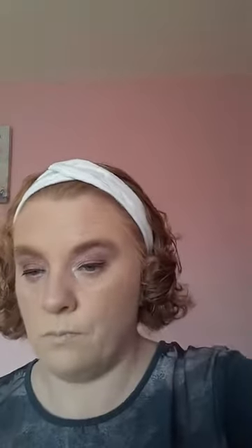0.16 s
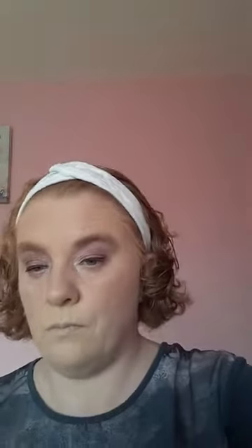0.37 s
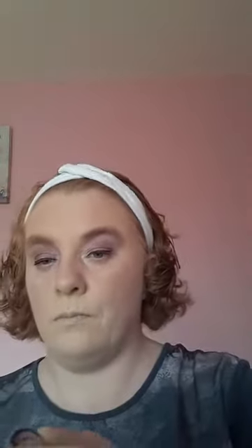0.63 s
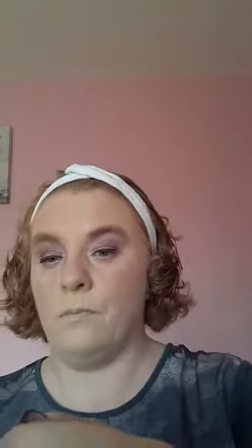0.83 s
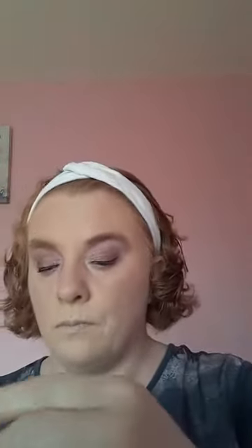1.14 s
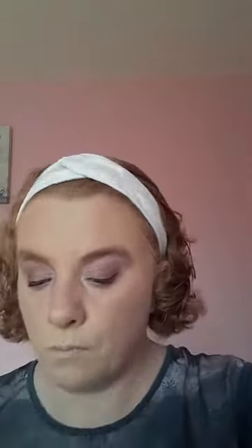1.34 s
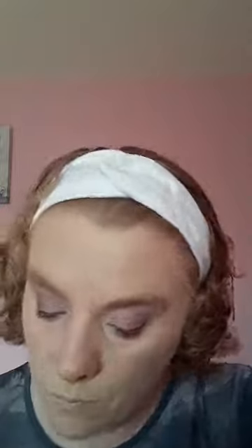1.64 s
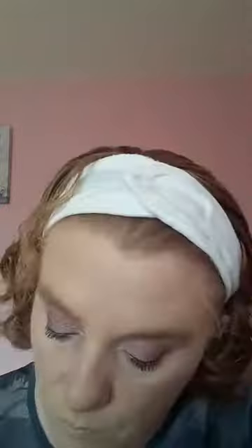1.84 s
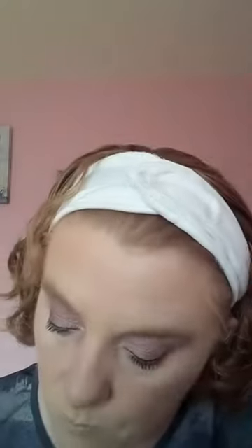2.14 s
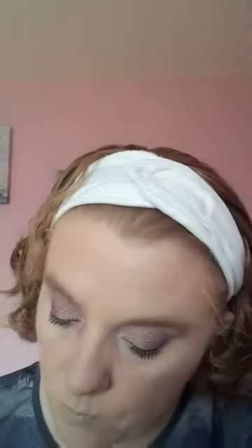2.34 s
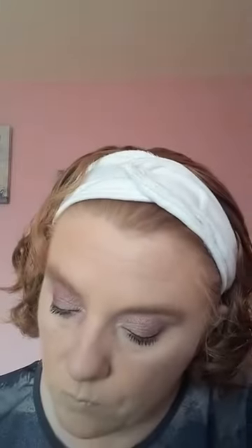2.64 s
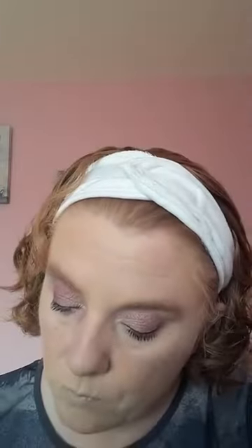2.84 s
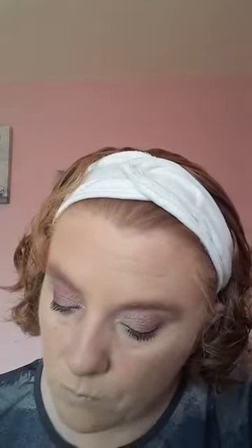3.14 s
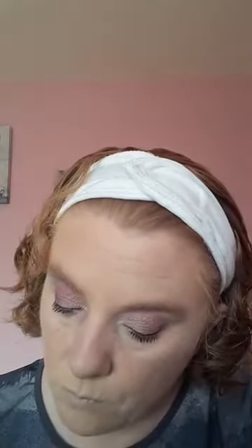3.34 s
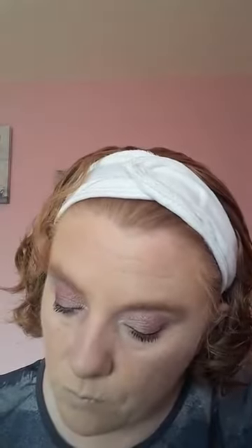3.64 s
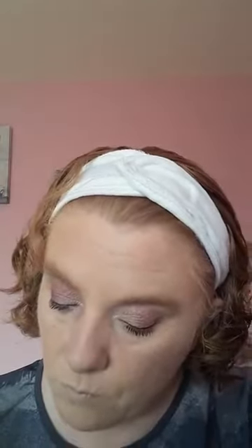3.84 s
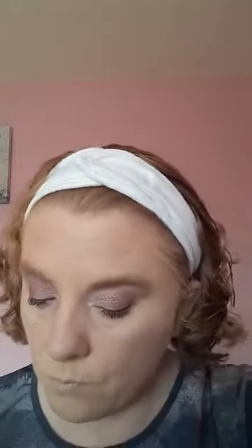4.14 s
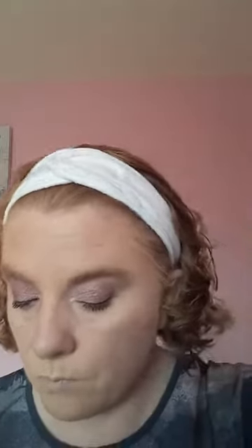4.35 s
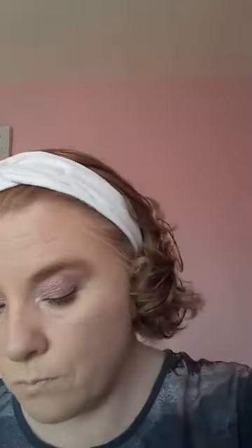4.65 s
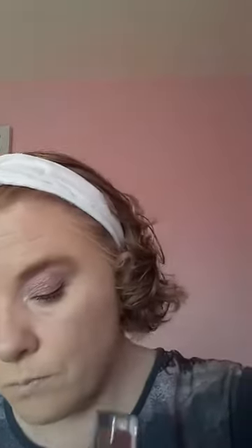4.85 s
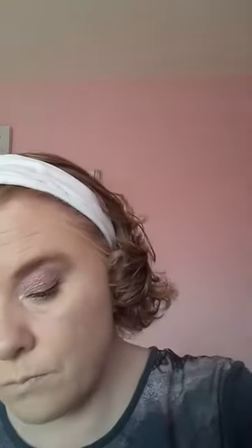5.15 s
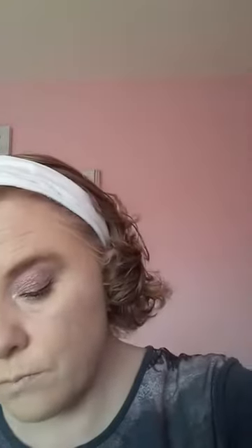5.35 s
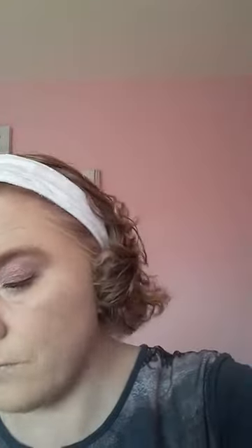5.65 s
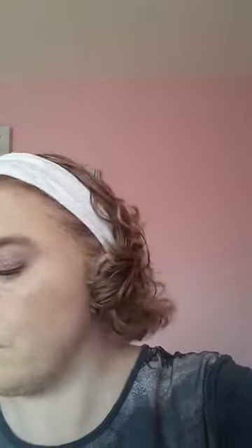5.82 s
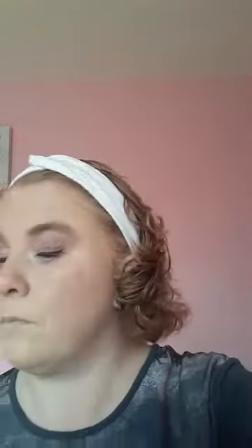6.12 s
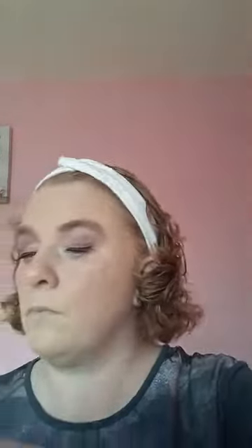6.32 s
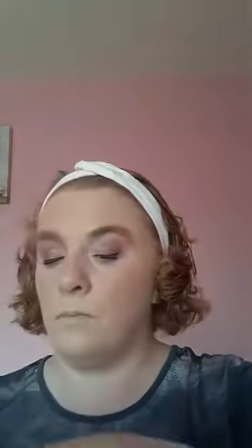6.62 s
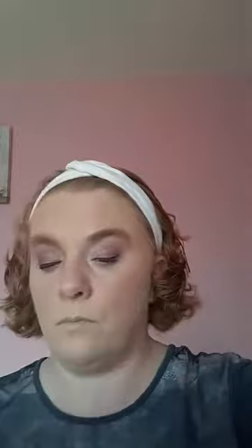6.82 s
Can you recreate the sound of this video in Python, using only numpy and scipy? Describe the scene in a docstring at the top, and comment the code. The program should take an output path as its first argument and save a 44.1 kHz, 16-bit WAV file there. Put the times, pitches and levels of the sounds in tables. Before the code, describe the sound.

Small hard plastic make-up cases clatter and click in a hollow tray as a hand rummages, pauses briefly, then stirs in denser bursts.

```python
"""A hand rummages through small hard plastic make-up cases in a hollow tray, in a quiet furnished room.
First the tail of an earlier knock and a short burst; then a lull over faint room tone, with a few light contacts.
From about 2.5 s denser bursts: each knock is a bright tick, a short shell ring and the tray's hollow note, all
decaying sines; random rattles and noise scrapes crowd between, noise rumbles as the tray shifts on the table,
and decaying-noise reflections answer. The bursts thin out after 6 s; one faint tap comes near the end."""
import sys
import numpy as np
from scipy import signal
from scipy.io import wavfile
from scipy.ndimage import uniform_filter1d

SR = 44100
rng = np.random.default_rng(int(sys.argv[2]) if len(sys.argv) > 2 else 0)


def dump(signal):
    """Clip the signal to [-1, 1] and save it as 16-bit WAV at the path in sys.argv[1]."""
    limited = np.clip(np.atleast_2d(signal).T, -1, 1)
    pcm = np.round(limited * 32767).astype(np.int16)
    wavfile.write(sys.argv[1], SR, pcm)


def how_loud(loudness_db):
    """Turn decibels into a plain amplitude multiplier (0 dB gives 1, 20 dB gives 10)."""
    steps = np.asarray(loudness_db, float) / 20
    return 10 ** steps


N = 307818

# clear knocks: (time [s], tray note level [dB], case pitch [Hz], case ring level [dB], bright tick level [dB])
CLEAR_KNOCKS = [(0.028, -42, 1845, -44, -35), (0.049, -13.5, 3120, -21.5, -18),
                (0.054, -21.5, 2991, -13.5, -21), (0.073, -21.5, 2204, -31.5, -19),
                (0.0852, -16.5, 2140, -23, -16.5), (0.096, -24.5, 1986, -18, -16.5),
                (0.103, -10.5, 2646, -24, -23), (0.1442, -17.5, 3398, -18, -12),
                (0.1936, -15, 2540, -19, -20), (0.204, -20, 1870, -24, -21.5),
                (0.2084, -14, 3218, -27.5, -20.5), (0.2256, -33, 2560, -14, -14.5),
                (0.238, -26, 2700, -17.5, -23), (0.2416, -13, 2618, -23.5, -26.5),
                (0.2623, -24, 2809, -24, -25.5), (0.2745, -32.5, 2706, -25, -27.5),
                (0.3111, -24.5, 2201, -33, -34), (0.3197, -40.5, 2600, -39, -32.5),
                (0.3378, -23.5, 2193, -29, -34.5), (0.6172, -44.5, 2250, -43.5, -49.5),
                (0.6848, -50.5, 1640, -81, -69), (0.7169, -48, 2280, -61.5, -53.5),
                (2.016, -40, 2350, -40, -43), (2.0677, -43, 5300, -48, -50), (2.08, -38, 2346, -41.5, -54),
                (2.239, -71, 4550, -51, -48), (2.25, -45.5, 4500, -59.5, -59.5),
                (2.3624, -42.5, 1630, -50.5, -45.5), (2.373, -43, 1707, -49, -44.5),
                (2.4208, -50, 1500, -45.5, -57), (2.4447, -40, 2000, -38.5, -51.5),
                (2.515, -27, 1650, -52, -42), (2.5548, -24, 2008, -24, -32.5),
                (2.589, -18, 3073, -13.5, -20.5), (2.612, -32.5, 2430, -26, -23.5),
                (2.6182, -21, 3002, -24.5, -23), (2.7188, -39, 1794, -20, -15),
                (2.723, -29.5, 1910, -30, -20.5), (2.7588, -27.5, 2880, -32, -16),
                (2.7637, -27, 1840, -52, -24), (2.7752, -30, 2480, -23.5, -14),
                (2.784, -27.5, 1557, -27.5, -25), (2.793, -46, 2520, -39, -29),
                (2.806, -47, 2363, -36.5, -30), (2.8288, -26, 3132, -21, -22),
                (2.969, -28.5, 2483, -25, -31.5), (2.979, -21.5, 3710, -18.5, -17.5),
                (2.987, -22.5, 1978, -22.5, -27.5), (2.9964, -19, 3304, -21.5, -17),
                (3.0064, -21, 2499, -24.5, -8.5), (3.022, -27.5, 2552, -27, -27.5),
                (3.077, -37, 3260, -10.5, -17), (3.0861, -25.5, 1504, -16.5, -8.5),
                (3.096, -34.5, 1984, -18, -30.5), (3.1294, -16.5, 4072, -15.5, -12),
                (3.1416, -26, 4000, -19.5, -17), (3.1534, -14, 2300, -16, -16.5),
                (3.166, -14.5, 3036, -19, -15.5), (3.193, -42.5, 3488, -25.5, -26.5),
                (3.292, -34.5, 2452, -27.5, -17), (3.3119, -30.5, 1658, -44.5, -26.5),
                (3.3744, -25, 2984, -35, -24.5), (3.4801, -32.5, 2988, -33.5, -34.5),
                (3.486, -19, 1474, -36, -46.5), (3.4923, -29.5, 5490, -17, -14),
                (3.4978, -49, 4025, -31, -20), (3.5986, -29, 2850, -38.5, -37.5),
                (3.6661, -30, 2810, -27.5, -19.5), (3.7149, -23.5, 3339, -17.5, -11),
                (3.7667, -23, 3293, -24.5, -18), (3.7981, -42.5, 3445, -20, -14.5),
                (3.8045, -20.5, 2869, -11, -31.5), (3.823, -29.5, 2716, -24, -52.5),
                (3.8471, -14, 1712, -15.5, -9), (3.907, -22.5, 2295, -27.5, -43),
                (3.953, -21, 2449, -27, -18.5), (3.9577, -15.5, 2583, -23, -30),
                (3.972, -24.5, 1536, -40, -36.5), (4.1108, -42, 2760, -39.5, -27.5),
                (4.1155, -19.5, 1817, -36.5, -38.5), (4.1213, -13.5, 4210, -21.5, -17),
                (4.1404, -16, 1620, -43.5, -35), (4.1889, -13.5, 4036, -14, -13),
                (4.2009, -16.5, 2438, -15.5, -21.5), (4.2451, -16.5, 4336, -20, -12),
                (4.259, -17.5, 1840, -20, -16), (4.2655, -27.5, 2946, -22.5, -8),
                (4.2784, -15.5, 3368, -30.5, -20), (4.2885, -16.5, 1993, -26.5, -34.5),
                (4.318, -23.5, 1609, -28, -30), (4.331, -22.5, 1640, -28.5, -31),
                (4.344, -22.5, 1466, -32, -45.5), (4.4554, -21, 1540, -14, -29.5),
                (4.4596, -11.5, 1839, -25, -16.5), (4.51, -25.5, 1680, -18.5, -45),
                (4.658, -34, 1643, -22, -25.5), (4.6851, -27.5, 1671, -22, -19),
                (4.7634, -44, 3940, -29.5, -28), (5.0402, -75.5, 2843, -38.5, -41.5),
                (5.143, -39, 2765, -49, -48), (5.2081, -19.5, 2507, -24, -24.5),
                (5.2549, -31, 1640, -20.5, -22), (5.271, -27, 1995, -48.5, -55),
                (5.337, -47, 3500, -50.5, -55), (5.3484, -32, 2530, -35.5, -27),
                (5.3649, -20.5, 1685, -37.5, -46.5), (5.3768, -39.5, 2888, -13.5, -9.5),
                (5.394, -16.5, 2580, -13, -21), (5.4175, -62, 2596, -21.5, -19.5),
                (5.487, -21.5, 1420, -27.5, -46.5), (5.503, -28, 2705, -34.5, -28.5),
                (5.605, -19.5, 3060, -13.5, -8), (5.6168, -19.5, 2910, -41.5, -14),
                (5.6235, -44.5, 3108, -39.5, -21), (5.6648, -18, 3311, -16.5, -29),
                (5.6948, -22, 2020, -13, -20.5), (5.7305, -41, 2536, -29, -29),
                (5.801, -60.5, 2470, -37, -34.5), (5.889, -54, 1680, -35, -42),
                (5.9291, -10.5, 3100, -11.5, -16), (6.0227, -28.5, 1645, -27, -41),
                (6.099, -29.5, 3360, -50, -43), (6.1222, -32, 5306, -27, -27),
                (6.1849, -46.5, 6050, -45, -33.5)]


def rms_one(x):
    """Scale to rms 1."""
    return x / np.sqrt(np.mean(x ** 2) + 1e-20)


def at_hz(points, hz):
    """Read a (frequency, value) table on a log-frequency axis."""
    table_hz, values = np.transpose(points)
    return np.interp(np.log(hz), np.log(table_hz), values)


def band(x, low_hz, high_hz):
    """Butterworth band-pass."""
    return signal.sosfilt(signal.butter(2, [low_hz, high_hz], "band", fs=SR, output="sos"), x)


def highpass(x, order, edge_hz):
    """Butterworth high-pass."""
    return signal.sosfilt(signal.butter(order, edge_hz, "high", fs=SR, output="sos"), x)


def gain_in_time(curve):
    """Gain of a (time, level) curve."""
    return how_loud(np.interp(np.arange(N) / SR, *np.transpose(curve)))


def knocks():
    """Clear knocks; the upper ring's level lies between tick and case ring, less an offset."""
    s, tray_db, case_hz, case_db, tick_db = np.transpose(CLEAR_KNOCKS)
    tick_share, below_db = 0.93, 3.5
    upper_db = tick_share * tick_db + (1 - tick_share) * case_db - below_db
    return contacts(s, tray_db, case_hz, case_db, upper_db, tick_db, spread_db=1.0)


def contacts(s, tray_db, case_hz, case_db, upper_db, tick_db, spread_db):
    """A contact rings case and tray: the tick peaks first, the tray note swells in after it."""
    # tray modes: (frequency [Hz], level [dB], t60 [s])
    tray_modes = [(713, -8.5, 0.016), (786, -4, 0.038), (864.1, -2.5, 0.065), (1045.6, -6.5, 0.033),
                  (1280, -8.5, 0.014), (1570, -13.5, 0.0052), (368, -18.5, 0.0097)]
    # case shell modes: (multiple of the case pitch [1], level [dB], t60 [s])
    shell_modes = [(1.0, -1, 0.014), (.62, -8, 0.012), (.8, -9, .01), (1.25, -14, 0.006)]
    # upper ring modes: (frequency [Hz], level [dB], t60 [s])
    upper_modes = [(4500, -13, 0.004), (5330, -2, 0.01), (6400, -2, 0.005)]
    # bright tick modes: (frequency [Hz], level [dB], t60 [s])
    tick_modes = [(7532, -12, 0.0046), (8463, 1.5, 0.017), (10000, -3.5, 0.011), (10510, -2, 0.008),
                  (13600, -4, 0.006)]
    tray = strike(s, tray_db, tray_modes, 0.08, 2 * spread_db, 0.002, ragged=0.17, samples=1500)
    shell = strike(s, case_db, shell_modes, 0.04, spread_db, 0.0021, ragged=0.62, pitch=case_hz)
    upper = strike(s, upper_db, upper_modes, 0.045, 2 * spread_db, 0.0014, ragged=0.62)
    tick = strike(s, tick_db, tick_modes, 0.04, spread_db, 0.00088, ragged=0.6)
    # keeps the flutter's low spill out of the knocks
    return highpass(tray + shell + upper + tick, 4, 330)


def strike(s, level_db, modes, detune, spread_db, contact_s, ragged=0, pitch=1, samples=900):
    """Each contact swells briefly, then every mode dies away; no two cases ring quite alike."""
    luck = rng.standard_normal((len(s), len(modes), 3))
    # glancing contacts last longer than square ones
    contact_s = contact_s * 1.5 ** luck[:, 0, 2:]
    t = np.arange(samples) / SR
    swell = np.sin(np.pi / 2 * np.minimum(t / contact_s, 1)) ** 2
    decay_s = np.maximum(t - contact_s, 0)
    # loose parts chatter while they ring: a fast random flutter smears the pitches
    flutter = rng.standard_normal((len(s), samples))
    flutter = 5 * uniform_filter1d(uniform_filter1d(flutter, 16), 16)
    rings = 0
    for k, (hz, mode_db, t60_s) in enumerate(modes):
        mode_hz = hz * pitch * np.exp(detune * luck[:, k, 0])
        phase = 2 * np.pi * mode_hz[:, None] * t + np.pi * luck[:, k, 1:2]
        gain = how_loud(level_db + mode_db + spread_db * luck[:, k, 2])[:, None]
        rings = rings + gain * np.sin(phase) * how_loud(-60 * decay_s / t60_s)
    # ragged: power share of the fluttering part
    rings = rings * swell * (np.sqrt(1 - ragged) + np.sqrt(ragged) * flutter)
    at = (np.asarray(s) * SR).astype(int)[:, None] + np.arange(samples)
    return np.bincount(at.ravel(), rings.ravel(), N + samples)[:N]


def rattles():
    """Small uneven contacts that tumble in clumps, each case with a pitch of its own."""
    mean_per_s = 170
    chance = rng.random((int(mean_per_s * N / SR), 3))
    # squared exponential gaps: many short, a few long
    gaps_s = np.log(chance[:, 0]) ** 2 / 2 / mean_per_s
    s = np.cumsum(gaps_s) % (N / SR)
    size_db = 0.83 * np.minimum(-np.log(chance[:, 1]), 3.5)
    case_hz = 1400 * 2.0 ** chance[:, 2]
    rings = contacts(s, size_db, case_hz, size_db + 6.5, size_db - 9.0, size_db, spread_db=3.0)
    return how_loud(-6.5) * loose_motion() * rms_one(rings)


def scraping():
    """Cases slide past each other: dense tiny slips of uneven size."""
    slips = rng.laplace(size=N) * (rng.random(N) < 0.05)
    return how_loud(-12) * loose_motion() * rms_one(band(slips, 1100, 6000))


def loose_motion():
    """The stirring level, sinking as the cases settle after each clear knock."""
    # the hand stirring: (time [s], level [dB])
    stirring = [(0.0, -35.5), (0.25, -25.5), (0.41, -42), (0.6, -67.5), (2.0, -81.5), (2.52, -58),
                (2.69, -30), (2.95, -47.5), (3.16, -30.5), (3.4, -39.5), (3.85, -39), (4.08, -39),
                (4.28, -27), (4.39, -31), (4.64, -33), (4.86, -65), (5.17, -71), (5.38, -21), (5.6, -43.5),
                (6.04, -42), (6.3, -67.5)]
    settle_db_per_s, settled_db = 150.5, -6.5
    s, t = np.transpose(CLEAR_KNOCKS)[0], np.arange(N) / SR
    last = np.maximum(np.searchsorted(s, t) - 1, 0)
    since_s = np.abs(t - s[last])
    return gain_in_time(stirring) * how_loud(np.maximum(-settle_db_per_s * since_s, settled_db))


def rumble():
    """The tray shifts on the table: lumpy low dragging noise, and the table top's deeper thud."""
    # shoves: (time of the strongest moment [s], dragging level [dB], deep thud level [dB])
    shoves = [(0.11, -27, -40), (0.249, -39, -37.5), (2.1, -63.5, -56.5), (2.46, -68, -48),
              (2.61, -39, -37), (2.75, -36.5, -48), (3.018, -35, -42), (3.18, -33.5, -41.5),
              (3.5, -40, -54), (3.72, -47.5, -43), (3.95, -45, -49.5), (4.15, -44, -49),
              (4.3, -38.5, -39.5), (4.7, -47, -51.5), (5.27, -48, -51), (5.41, -38, -42.5),
              (5.51, -39.5, -52.5), (5.71, -40, -48.5), (5.952, -42.5, -53.5), (6.2, -56, -52)]
    s, drag_db, thud_db = np.transpose(shoves)[:, :, None]
    lumps = how_loud(2.1 * rms_one(band(rng.standard_normal(N), 4.9, 67)))
    drag, thud = rng.standard_normal((2, N)) * lumps
    drag = shoving(s, drag_db) * rms_one(band(drag, 130, 600))
    thud = shoving(s, thud_db) * rms_one(band(thud, 70, 175))
    return drag + thud


def shoving(s, peak_db):
    """Every shove swells quickly and fades more slowly; overlapping shoves add in power."""
    rise_db_per_s, fall_db_per_s = 291.5, 117
    t = np.arange(0, N + 64, 64) / SR
    below_db = np.maximum(rise_db_per_s * (s - t), fall_db_per_s * (t - s))
    gain = np.sqrt(np.sum(how_loud(peak_db - below_db) ** 2, axis=0))
    return np.interp(np.arange(N) / SR, t, gain)


def far_tap():
    """A faint single tap: one decaying sine."""
    # small tap further off: (time [s], level [dB], frequency [Hz], t60 [s])
    tap = (6.862, -56, 2600, .007)
    s, tap_db, hz, t60_s = tap
    return strike([s], tap_db, [(hz, 0, t60_s)], detune=0, spread_db=0, contact_s=0.002)


def earlier_knock():
    """The room still rings from a knock a moment before the start."""
    knock = contacts([0], 0, 2500, -6, -9, -7, spread_db=0)
    ago = SR // 20
    return how_loud(-19.0) * np.pad(room(knock)[ago:], (0, ago))


def changing_room(x):
    """The reverberation fades between four different decaying-noise tails, so its colour keeps changing."""
    rounds_per_s = 3.5
    turn = np.pi * rounds_per_s * np.arange(N) / SR
    wet = 0
    for k in range(4):
        wet = wet + room(x * np.cos(turn + np.pi * k / 4) ** 6 * 0.8)
    return wet


def room(x, gap_s=0.005, rise_s=0.004):
    """Reflections: noise that starts after a gap, builds up and dies band by band; energy 1."""
    # reverberation: (frequency [Hz], t60 [s])
    room_t60 = [(100, 0.34), (800, 0.4), (5000, 0.36), (10000, 0.28)]
    t = np.arange(SR // 2) / SR
    edges_hz = 50 * 2 ** np.arange(0, 8.6, 0.5)
    white, tail = rng.standard_normal(len(t)), 0
    for low, high in zip(edges_hz, edges_hz[1:]):
        t60_s = at_hz(room_t60, np.sqrt(low * high))
        tail = tail + band(white, low, high) * how_loud(-60 * t / t60_s)
    tail = tail * (1 - np.exp(-np.maximum(t - gap_s, 0) / rise_s))
    return signal.fftconvolve(x, tail / np.sqrt(np.sum(tail ** 2)))[:N]


def room_tone():
    """Steady faint air and microphone noise, shaped in third octaves."""
    # noise spectrum: (frequency [Hz], relative level per Hz [dB])
    tone_spectrum = [(15, -39.5), (25, -11.5), (45, -4), (91, 1), (237, -4.5), (271, -5.5), (372, -9.5),
                     (1190, -24), (1400, -22.5), (4030, -37.5), (7610, -25), (14000, -37.5)]
    edges_hz = 22 * 2 ** np.arange(0, 9.6, 1 / 3)
    white, out = rng.standard_normal((2, N)), 0
    # neighbouring bands take different noises
    for k, (low, high) in enumerate(zip(edges_hz, edges_hz[1:])):
        gain = how_loud(at_hz(tone_spectrum, np.sqrt(low * high)))
        out = out + gain * band(white[k % 2], low, high)
    return how_loud(-71) * rms_one(out)


def microphone(x):
    """Little passes above about 10 kHz, the range around 4.3 kHz is slightly weaker, and deep bass is cut."""
    edge_hz, above_edge_db = 10066, -15
    dip_hz, dip_depth = 4290, 0.24
    x = highpass(x, 2, 60)
    x = x - dip_depth * band(x, dip_hz / 1.5, dip_hz * 1.3)
    below = signal.sosfilt(signal.cheby2(8, 40, 1.08 * edge_hz, fs=SR, output="sos"), x)
    above = band(band(x, edge_hz, 13000), edge_hz, 14000)
    return below + how_loud(above_edge_db) * above


def scene():
    """Cases and tray near the microphone, their room answer, and the room tone."""
    near, tap = knocks() + rattles() + scraping(), far_tap()
    # the walls swallow part of the treble
    dulled = near - 0.41 * band(near, 5700, 13000)
    wet = changing_room(how_loud(-1.5) * dulled + tap) + earlier_knock()
    return (microphone(near + tap + wet + rumble()) + room_tone())[None]


def low_pass(x):
    """Removes everything above the highest recorded frequency."""
    return signal.sosfilt(signal.butter(12, 14470, fs=SR, output="sos"), x)


def record(dry):
    """Round the peaks by soft saturation and set the final level."""
    mix = 0.78 * np.tanh(dry / 0.86)
    return low_pass(mix)


dry = scene()
out = record(dry)
dump(out)
```